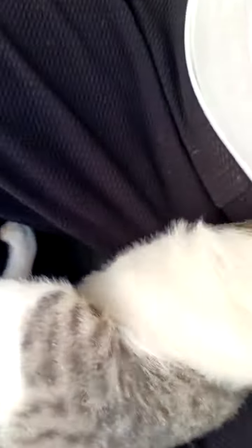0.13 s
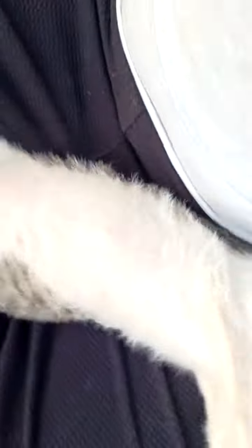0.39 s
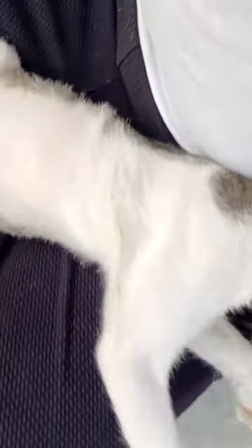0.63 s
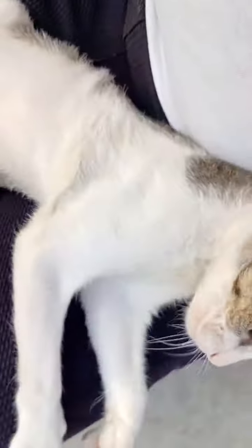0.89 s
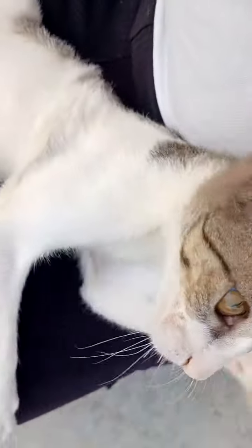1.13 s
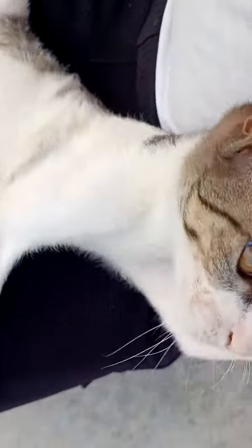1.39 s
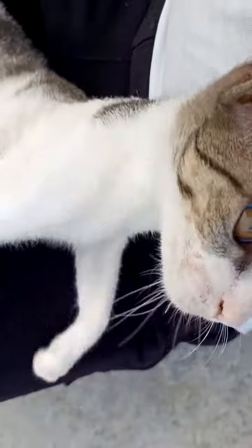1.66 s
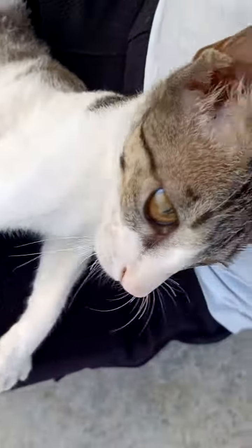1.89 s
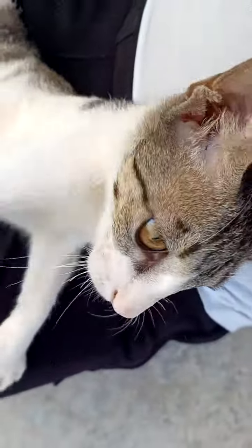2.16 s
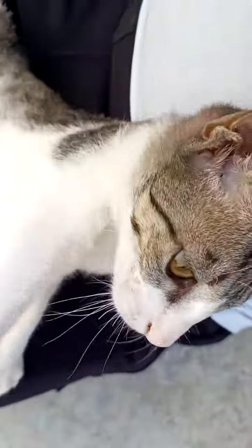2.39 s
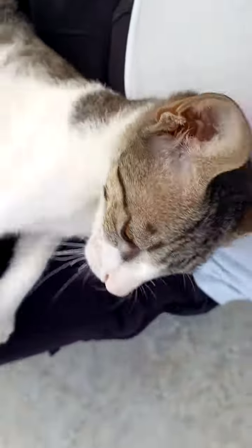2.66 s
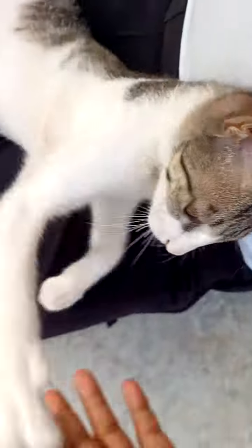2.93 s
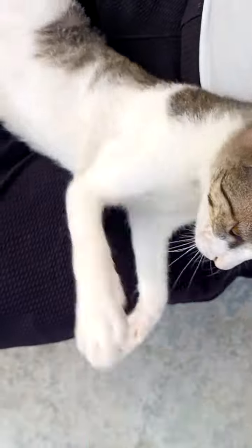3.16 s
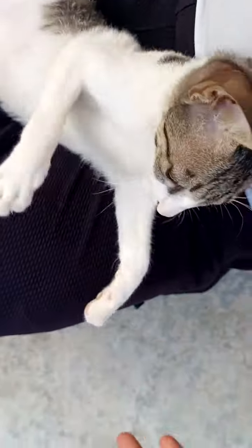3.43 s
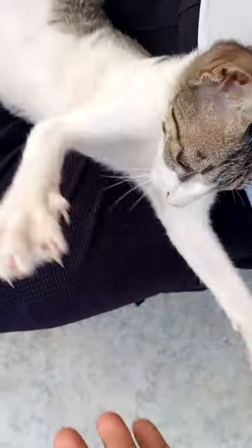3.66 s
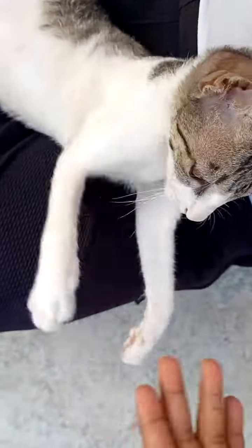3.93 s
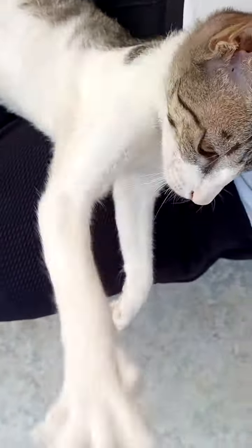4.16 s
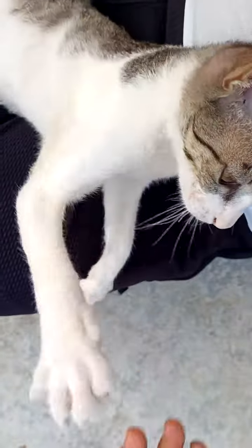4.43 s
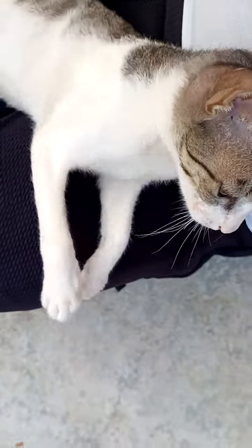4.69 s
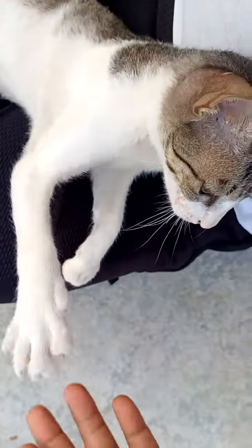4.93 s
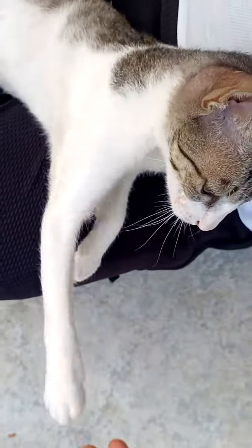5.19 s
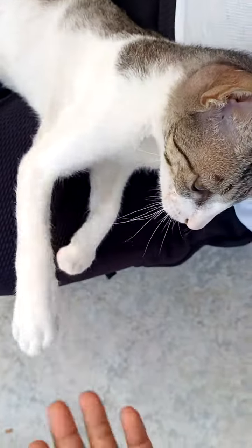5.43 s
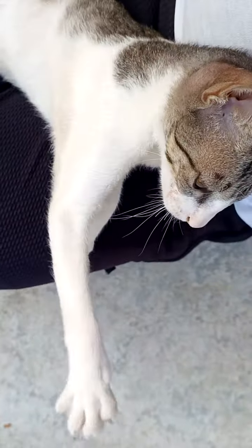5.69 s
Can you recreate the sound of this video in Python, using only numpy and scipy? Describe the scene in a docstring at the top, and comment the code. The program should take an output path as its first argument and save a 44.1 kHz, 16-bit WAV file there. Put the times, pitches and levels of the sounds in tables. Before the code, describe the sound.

Close, grainy cat purring with buffeting low wind, rising bird sweeps bouncing off walls, faint traffic and a few distant horn beeps.

```python
"""Kitten purring on a lap

A kitten purrs on someone's lap, close to a handheld recorder with two microphone ports.
The purr is a train of snaps from the vocal folds, coloured by throat resonances.
Shaped noise makes the wind on each port, the far traffic, a grainy hiss and the claw ticks.
Gliding sines make small birds in an echoing yard; rows of overtones make the far horns."""
import sys
import numpy as np
from scipy import signal
from scipy.fft import rfft, irfft, next_fast_len
from scipy.io import wavfile
from scipy.ndimage import uniform_filter1d

SR = 44100
rng = np.random.default_rng(int(sys.argv[2]) if len(sys.argv) > 2 else 0)


def store_wav(level_fs):
    """Save 16-bit WAV to argv[1]."""
    pcm = np.round(np.clip(np.atleast_2d(level_fs), -1, 1) * 32767)
    wavfile.write(sys.argv[1], SR, pcm.T.astype(np.int16))


def gain_from_db(level_db):
    """Convert decibel levels to linear amplitude factors (20 dB per decade)."""
    decades = np.asarray(level_db, float) / 20
    return 10 ** decades


N = 256654   # length in samples


def in_time(rows):
    """Columns of a table whose rows start with a time, one value per sample."""
    s, *columns = np.transpose(rows)
    return [np.interp(np.arange(N) / SR, s, column) for column in columns]


def at_hz(points, hz):
    """A spectrum read on a log-frequency axis."""
    point_hz, value = np.array(points).T
    return np.interp(np.log(hz), np.log(point_hz), value)


def level_in(x, low_hz, high_hz):
    """Scales x so that the given band has rms 1, averaged over the ports."""
    power, hz = np.abs(rfft(x)) ** 2, np.fft.rfftfreq(N, 1 / SR)
    in_band = (hz > low_hz) & (hz < high_hz)
    return x * N / np.sqrt(2 * np.mean(power[..., in_band].sum(-1)))


def drift(rate, channels=1):
    """Random wander: normal draws of spread 1, twice rate per second, joined by straight lines."""
    steps = int(N / SR * rate * 2) + 2
    places = np.linspace(0, steps - 1, N)
    draws = rng.standard_normal((channels, steps))
    return np.array([np.interp(places, np.arange(steps), row) for row in draws])


def coloured(spectrum, likeness=((1, 0),)):
    """Stereo noise with a given spectrum and likeness between the ports."""
    hz = np.fft.rfftfreq(N, 1 / SR) + 1
    mid, side = rfft(rng.standard_normal((2, N))) * gain_from_db(at_hz(spectrum, hz))
    alike = np.clip(at_hz(likeness, hz), -1, 1)
    return irfft(np.sqrt(1 + alike) * mid + np.sqrt(1 - alike) * side * [[1], [-1]], N)


def pan(db):
    """Left and right gains, db apart, that keep the summed power."""
    left, right = gain_from_db(db / 2), gain_from_db(-db / 2)
    return np.array([left, right]) * np.sqrt(2 / (left ** 2 + right ** 2))


SWELL_EDGE_DB = 14.5   # a swell is this far down half a length from its peak


def swell(peak_s, half_s):
    """Power of a smooth rise and fall, 1 at its peak."""
    from_peak = (np.arange(N) / SR - peak_s) / half_s
    return gain_from_db(-2 * SWELL_EDGE_DB * np.minimum(from_peak ** 2, 20))


# Far traffic. Each row: frequency in Hz, density in dB per Hz before levelling.
TRAFFIC_SPECTRUM = [(24, -54), (40, -6.5), (107, -7), (216, -15), (252, -17), (350, -18), (426, -22),
                    (632, -25), (877, -30), (957, -29), (3120, -44.5), (3890, -42), (7500, -49),
                    (9750, -101), (16500, -120)]
# Traffic at the two ports. Each row: frequency in Hz, left-right likeness (1 is the same, 0 unrelated).
TRAFFIC_LIKENESS = [(60, 1), (130, 1), (290, 1), (640, -0.059), (1400, -0.073), (3000, -0.087)]
# Brighter part of the traffic. Each row: frequency in Hz, density in dB per Hz before levelling.
BRIGHT_TRAFFIC_SPECTRUM = [(1200, -32), (1800, -6), (2500, 1.5), (3300, 1.5), (4500, -22), (7000, -23)]
# Grainy hiss. Each row: frequency in Hz, density in dB per Hz before levelling.
HISS_SPECTRUM = [(1180, -79), (2000, -5), (3310, -10), (4010, 1.5), (4900, -1.5), (8100, -10), (13600, -8),
                 (16000, -11.5)]
# Steady background. Each row: time in seconds, then traffic, its brighter part and hiss, band levels in dB.
AMBIENCE_LEVELS = [(0, -64, -88, -71), (.5, -64.5, -70, -73), (.9, -65.5, -80.5, -74),
                   (1.6, -65, -72.5, -72), (2.4, -66.5, -78, -75.5), (3.4, -68, -73, -74),
                   (4.0, -68.5, -76, -75), (4.6, -71.5, -85, -78), (5.2, -68.5, -72, -78),
                   (5.82, -67.5, -92, -79.5)]
# Brief swells of the background. Each row: peak in seconds, half length in seconds,
# then what they add to the traffic, its brighter part and the hiss, band levels in dB.
BACKGROUND_SWELLS = [(.01, .04, -70, -87, -59), (0.307, 0.11, -60.5, -71, -67.5),
                     (0.476, 0.095, -66.5, -67.5, -66.5), (1.03, 0.069, -67, -85, -74),
                     (1.815, 0.096, -65.5, -74, -91), (1.94, 0.035, -76, -87, -78.5),
                     (2.151, 0.1, -61.5, -70, -81), (2.68, 0.087, -66, -86, -75),
                     (3.057, 0.086, -71, -75, -72), (3.49, 0.069, -67, -70, -81),
                     (4.13, .04, -83, -77, -72), (4.264, .06, -68, -74, -77),
                     (4.97, 0.087, -69.5, -75, -89), (5.3, .06, -69, -75, -93)]


def background():
    """Far traffic and a grainy hiss, as noise; all of it swells briefly at times."""
    power = gain_from_db(in_time(AMBIENCE_LEVELS)) ** 2
    for peak_s, half_s, *db in BACKGROUND_SWELLS:
        power = power + gain_from_db(db)[:, None] ** 2 * swell(peak_s, half_s)
    dull_gain, bright_gain, hiss_gain = np.sqrt(power)
    dull = level_in(coloured(TRAFFIC_SPECTRUM, TRAFFIC_LIKENESS), 745, 2040)
    bright = level_in(coloured(BRIGHT_TRAFFIC_SPECTRUM), 2300, 3420)
    grainy = coloured(HISS_SPECTRUM) * gain_from_db(2.0 * drift(250, channels=2))
    hiss = level_in(grainy, 6860, 17400) * pan(np.array([1.4]))   # a little stronger on the left
    return dull * dull_gain + bright * bright_gain + hiss * hiss_gain


# Far horns. Each row: start in seconds, length in seconds, pitch in Hz, relative level in dB.
HORN_CALLS = [(3.07, .16, 517, -70), (3.5, .3, 517, -73), (4.97, .32, 435, -68)]
# Tone of the horns. Each row: frequency in Hz, overtone gain in dB.
HORN_OVERTONES = [(450, -12), (900, 3), (1050, 0), (1300, -18), (1550, -2), (1750, -18), (2200, -10),
                  (2600, -12), (3050, -4), (3500, -25)]


def horns():
    """Slightly unsteady buzzers, each a sum of its first eight harmonics."""
    out, waver = np.zeros(N), 1 + 0.008 * drift(60)[0]
    for s, length_s, hz, db in HORN_CALLS:
        i, t = int(s * SR), np.arange(int(length_s * SR)) / SR
        phase = 2 * np.pi * np.cumsum(hz * waver[i:i + len(t)]) / SR
        tone = sum(gain_from_db(at_hz(HORN_OVERTONES, k * hz)) * np.sin(k * phase + k * k) for k in range(1, 9))
        shape = np.clip(np.minimum(t, length_s - t) / 0.0056, 0, 1)   # 5.6 ms ramps
        out[i:i + len(t)] += gain_from_db(db) * tone * shape
    return out


def notes(table, wobble, rise, fall, bend):
    """Near-sines gliding in pitch, fast at first if bend is below 1; fast wobble makes them hoarse."""
    out, shake = np.zeros(N), 1 + wobble * drift(250)[0]
    for s, length_s, start_hz, end_hz, db in table:
        i, z = int(s * SR), np.linspace(0, 1, int(length_s * SR))
        hz = (start_hz + (end_hz - start_hz) * z ** bend) * shake[i:i + len(z)]
        shape = np.clip(np.minimum(z / rise, (1 - z) / fall), 0, 1)   # rise, fall: shares of the note
        out[i:i + len(z)] += gain_from_db(db) * shape * np.sin(2 * np.pi * np.cumsum(hz) / SR)
    return out


def whistle(curve, wobble):
    """One long sine that follows a curve of pitch and level."""
    hz, db = in_time(curve)
    sounding = (db != db[0]) & (db != db[-1])
    shaken_hz = hz * (1 + wobble * drift(250)[0])
    return sounding * gain_from_db(db) * np.sin(2 * np.pi * np.cumsum(shaken_hz) / SR)


# Rising sweeps across the yard. Each row: start in seconds, start, knee and top pitch in Hz,
# relative level in dB.
BIRD_SWEEPS = [(0.407, 4400, 5310, 5970, -50.5), (0.663, 4310, 5314, 5800, -52.5),
               (0.926, 3700, 4844, 5310, -54), (1.178, 3490, 4900, 5310, -53),
               (1.435, 3300, 4740, 5240, -55.5), (1.694, 3350, 4760, 5220, -56),
               (2.008, 3230, 5020, 5476, -56.5), (3.665, 4240, 5430, 6440, -50),
               (3.949, 4594, 5220, 6090, -51), (4.255, 4430, 5066, 5850, -53)]
SWEEP_S = .118   # length of a sweep


def sweeps(knee=.68, top=.84, rise=0.35, wobble=.012):
    """Each sine climbs to a knee, slides quickly to its top note and holds it a moment."""
    out, shake = np.zeros(N), 1 + wobble * drift(250)[0]
    for s, start_hz, knee_hz, top_hz, db in BIRD_SWEEPS:
        i, z = int(s * SR), np.linspace(0, 1, int(SWEEP_S * SR))
        hz = np.interp(z, [0, knee, top, 1], [start_hz, knee_hz, top_hz, top_hz]) * shake[i:i + len(z)]
        shape = np.clip(np.minimum(z / rise, (1 - z) / 0.24), 0, 1)
        out[i:i + len(z)] += gain_from_db(db) * shape * np.sin(2 * np.pi * np.cumsum(hz) / SR)
    return out


YARD_T60_S = 0.31   # the echoes are 60 dB down by then


def yard(x, direct_db, echo_db, build_s=.01, bend=1.1):
    """Direct sound, then dense echoes off walls that build up and fade; other ones at each port."""
    t = np.arange(int(.6 * SR)) / SR
    envelope = (1 - np.exp(-t / build_s)) * gain_from_db(-60 * (t / YARD_T60_S) ** bend)
    echoes = rng.standard_normal((2, len(t))) * envelope
    echoes = echoes / np.sqrt(np.sum(echoes ** 2, axis=1, keepdims=True))
    return gain_from_db(direct_db) * x + gain_from_db(echo_db) * signal.fftconvolve(x[None], echoes, axes=1)[:, :N]


# Hoarse chirrups further off. Each row: start in seconds, length in seconds, start and end pitch in Hz,
# relative level in dB.
FAR_CHIRRUPS = [(.035, 0.036, 6560, 6630, -54.5), (.055, 0.033, 5670, 5530, -59),
                (.07, 0.058, 4250, 4520, -64.5), (.172, .037, 6260, 6800, -56),
                (.18, 0.057, 5660, 5200, -61), (.207, 0.028, 4120, 4580, -59.5),
                (.39, 0.022, 5880, 6630, -57.5), (.6, .023, 4340, 4000, -68),
                (.626, .038, 6120, 6860, -58.5), (.886, 0.057, 5780, 6590, -58.5),
                (1.111, .027, 6770, 6930, -64), (1.137, .039, 5630, 6040, -58),
                (1.36, 0.074, 5170, 5900, -63), (1.364, 0.037, 6300, 6780, -64),
                (1.623, 0.039, 6600, 6964, -70), (1.643, 0.048, 5640, 6070, -63.5),
                (1.957, 0.03, 5580, 5806, -62.5), (2.325, .05, 1850, 2043, -64),
                (2.515, .065, 1750, 2020, -63), (2.637, .023, 3960, 6060, -65),
                (2.638, .028, 5600, 6700, -57), (2.691, .056, 5270, 5260, -67.5),
                (2.734, 0.037, 4000, 3530, -67), (3.298, .15, 4220, 3710, -72.5),
                (3.589, .067, 4700, 6010, -65.5), (3.787, .08, 3890, 3410, -71.5),
                (3.91, 0.062, 5750, 6940, -61), (3.98, 0.094, 2800, 3200, -76),
                (4.135, 0.027, 3500, 4860, -59.5), (4.188, 0.059, 5640, 6870, -62.5),
                (4.205, 0.034, 3300, 4400, -64.5), (4.21, 0.035, 1760, 2560, -72),
                (4.223, 0.097, 2430, 3520, -72), (4.329, 0.054, 3181, 2745, -71),
                (4.97, .06, 2490, 2510, -73.5), (5.17, .06, 2030, 2080, -74),
                (5.26, 0.046, 2410, 2080, -71)]
# A long buzzing trill, far off. Each row: time in seconds, pitch in Hz, relative level in dB.
FAR_TRILL = [(4.44, 4020, -87), (4.52, 3884, -76), (4.75, 3850, -77.5), (4.93, 3770, -77), (5.0, 3770, -95)]
# Thin twitter of a nearer bird. Each row: start in seconds, length in seconds, start and end pitch in Hz,
# relative level in dB.
NEAR_TWITTER = [(.691, .026, 3780, 3610, -59), (4.993, 0.042, 4430, 3470, -61.5),
                (5.112, 0.022, 4450, 3450, -63), (5.15, .026, 3300, 4300, -68),
                (5.267, 0.032, 5870, 3680, -68), (5.335, .022, 3440, 4250, -65),
                (5.365, .025, 4300, 3800, -69), (5.425, .015, 3400, 3750, -69),
                (5.445, .01, 4500, 3560, -73)]
# Its arched whistle. Each row: time in seconds, pitch in Hz, relative level in dB.
NEAR_ARCH = [(4.93, 4900, -88), (4.94, 5450, -59.5), (4.955, 5980, -65), (4.975, 6130, -50.5),
             (5.015, 6145, -54), (5.04, 5910, -60), (5.07, 5700, -55), (5.095, 5230, -56.5),
             (5.12, 4870, -66), (5.135, 4500, -70), (5.14, 4400, -110)]
# A faint sustained tone. Each row: time in seconds, pitch in Hz, relative level in dB.
FAINT_TONE = [(3.3, 545, -95), (3.5, 545, -68), (4.2, 545, -67), (4.4, 545, -95)]


def birds():
    """Far birds arrive mostly as echoes; the near bird, horns and faint tone have a clear direct path."""
    far = sweeps() + notes(FAR_CHIRRUPS, wobble=0.0458, rise=0.025, fall=0.099, bend=.65)
    far = far + whistle(FAR_TRILL, wobble=0.077)
    near = notes(NEAR_TWITTER, wobble=0.0029, rise=0.21, fall=0.082, bend=1.5)
    near = near + whistle(NEAR_ARCH, wobble=0.0081)
    near = near + horns() + whistle(FAINT_TONE, wobble=0.0093)
    return yard(far, direct_db=-1.0, echo_db=7.0) + yard(near, direct_db=-2.0, echo_db=-2.0)


# Claw on cloth. Each row: start in seconds, relative level in dB, ring in Hz, left minus right in dB.
CLAW_TICKS = [(0.315, -31, 5140, 3), (1.9353, -54, 12000, 2), (2.334, -56, 8900, -5),
              (2.653, -60.5, 11000, 1), (2.997, -60, 10000, -5)]


def ticks(t60_s=0.0062):
    """Short bright snaps of decaying noise, each with a ring filtered out of it."""
    t, out = np.arange(1200) / SR, np.zeros((2, N))
    for s, db, hz, pan_db in CLAW_TICKS:
        i = int(s * SR)
        snap = rng.standard_normal((2, len(t))) * gain_from_db(db - 60 * t / t60_s)
        resonance = signal.butter(1, [hz / 1.02, hz * 1.02], "band", fs=SR, output="sos")
        ring = signal.sosfilt(resonance, snap)
        out[:, i:i + len(t)] += pan(pan_db)[:, None] * (0.18 * snap + 5.0 * ring)
    return signal.sosfilt(signal.butter(1, 2500, "high", fs=SR, output="sos"), out)


# Wind thuds on a port. Each row: frequency in Hz, density in dB per Hz before levelling.
THUD_SPECTRUM = [(12, -40), (20, -28), (66, 4), (81, 2), (95, 3), (151, -19.5), (200, -29), (260, -28),
                 (440, -120)]
# Sharper rumble of the wind. Each row: frequency in Hz, density in dB per Hz before levelling.
RUMBLE_SPECTRUM = [(90, -20), (140, 5), (220, 2), (350, -8.5), (600, -26.5), (1200, -53.5)]
# Breeze on the ports. Each row: time in seconds, thud level in dB, left minus right in dB,
# rumble level in dB.
BREEZE_LEVELS = [(0, -37.5, -2, -50), (.35, -53.5, -4, -61), (.8, -54.5, -3, -63.5),
                 (1.05, -36.5, 3.5, -52), (1.35, -38, 10, -46), (1.6, -39, 11, -51.5),
                 (1.95, -60, -4, -62.5), (2.15, -46.5, 14, -56), (2.4, -49.5, 11, -63.5),
                 (2.6, -27.5, 25, -45), (2.8, -45, 9, -64), (2.95, -43.5, -1, -57.5), (3.25, -35, 3, -50),
                 (3.55, -32.5, -3, -50.5), (3.8, -45, -6, -63), (4.1, -60.5, -2, -62), (4.7, -52.5, 1, -61),
                 (5.3, -56, -7.5, -70), (5.82, -55, 6, -63)]
# Single eddies. Each row: peak in seconds, half length in seconds, thud level in dB,
# left minus right in dB, rumble against thud in dB.
WIND_EDDIES = [(0.025, 0.03, -28, -10.5, -6.5), (0.255, 0.029, -33, -14, -12.5),
               (0.295, 0.034, -30.5, -30, -19), (0.43, 0.021, -30, 20, -32), (0.583, 0.03, -38, -8, -24),
               (0.66, 0.029, -47, 15, -24), (0.966, 0.025, -31.5, 29, -12.5), (1.038, 0.018, -36, -13, -30),
               (1.097, .03, -33.5, 12, -14), (1.246, 0.057, -24, 30, -11.5), (1.268, 0.063, -19.5, 27, -25),
               (1.331, 0.025, -25, 23, -12), (1.471, 0.03, -24.5, 30, -40), (1.607, 0.019, -33, 18, -27),
               (1.769, 0.064, -35.5, 22, -35), (1.867, 0.033, -40.5, 16, -18), (1.994, 0.014, -41, 6, -14),
               (2.054, 0.026, -33.5, 13, -15), (2.142, 0.045, -33, 25, -25), (2.475, 0.038, -36, 15, -17),
               (2.678, .05, -24, 36, -25), (2.754, 0.018, -24, 28, -27), (2.846, 0.04, -30.5, -13, -22),
               (3.054, .07, -30, -18, -15.5), (3.188, 0.023, -32, 24, -24), (3.418, 0.048, -22, 2, -22.5),
               (3.526, 0.053, -21.5, -2, -21.5), (3.652, 0.043, -33, -22, -33),
               (3.953, 0.022, -44.5, -7, -26), (3.995, .025, -45.5, -5, -24), (4.12, 0.034, -47.5, 7, -20),
               (4.224, 0.032, -44.5, 13, -18), (4.273, 0.025, -42.5, 0, -16), (4.336, .02, -47, 1, -24),
               (4.691, 0.068, -42.5, 2, -21), (4.823, .03, -48, 3, -28), (4.918, 0.078, -51, 8, -23),
               (5.008, 0.024, -39.5, 10, -21), (5.158, 0.043, -48, -1, -24), (5.27, .06, -54, -14, -25),
               (5.705, 0.059, -46.5, -1, -25), (5.815, 0.038, -37, -8, -33)]


def wind(steadiness=.75, lumps_db=5.5):
    """Eddies thud on each port separately, over a shifting breeze; each carries some sharper rumble."""
    db, pan_db, rumble_db = in_time(BREEZE_LEVELS)
    thud_power, rumble_power = (gain_from_db([db, rumble_db])[:, None] * pan(pan_db)) ** 2
    for peak_s, half_s, db, pan_db, sharp_db in WIND_EDDIES:
        push = (gain_from_db(db) * pan(pan_db)[:, None]) ** 2 * swell(peak_s, half_s)
        thud_power = thud_power + push
        rumble_power = rumble_power + gain_from_db(2 * sharp_db) * push
    thud = level_in(coloured(THUD_SPECTRUM), 35, 140)
    envelope = np.abs(signal.hilbert(thud, next_fast_len(N)))[:, :N]
    swing = uniform_filter1d(envelope, size=1200)
    # Evens out the chance swings of the noise, so the levels follow the tables.
    thud = thud / swing ** np.clip(steadiness, 0, 1)
    lumpy = coloured(RUMBLE_SPECTRUM) * gain_from_db(lumps_db * drift(40, channels=2))
    rumble = level_in(lumpy, 157, 334)
    return np.sqrt(thud_power) * level_in(thud, 31, 170) + np.sqrt(rumble_power) * rumble


# Breaths, in and out by turns. Each row: start in seconds, larynx closures per second at the start.
BREATH_STARTS = [(0, 22.446), (.506, 24.509), (1.066, 23.542), (1.7, 24.109), (2.424, 23.56),
                 (3.252, 23.947), (4.105, 23.216), (4.787, 25.693), (5.745, 24.3)]
# Relative height of a snap at the start of each breath, in dB, one value per breath.
BREATH_LEVELS = [-47, -47.5, -45, -44, -45.5, -46, -45.5, -47, -47]
# Flaps of the vocal folds within a cycle. Each row: delay in seconds, level in dB, random spread in dB.
FOLD_FLAPS = [(0, 0, 2.8), (.004, -4.5, 5.0), (.014, -9, 4.0)]
# Throat resonances. Each row: frequency in Hz, width in Hz, relative level in dB.
THROAT_RESONANCES = [(170, 210, 7), (286, 177, 2), (556, 240, -15.5)]
FIRST_CLOSURE_S = .0165
RATE_SAG_PER_S = 3.948   # closures per second lost each second: twitching slows as a breath runs on
# A breath also weakens, and falters where the breath turns.
BREATH_FADE_DB_PER_S, TURN_DIP_DB, TURN_S = 4.5, 3.5, 0.033


def purr(jitter_s=0.00094, crest_db=14.0):
    """Each twitch snaps the folds shut; they flap twice more, and the throat colours the snaps."""
    start_s, rate = np.transpose(BREATH_STARTS)
    t = np.arange(N) / SR
    breath = np.clip(np.searchsorted(start_s, t, "right") - 1, 0, None)
    since = t - start_s[breath]
    count = np.cumsum(rate[breath] - RATE_SAG_PER_S * since) / SR - FIRST_CLOSURE_S * rate[0]
    closures = np.flatnonzero(np.diff(np.floor(count)))
    to_turn = np.abs(t[:, None] - start_s).min(axis=1)
    effort_db = np.array(BREATH_LEVELS)[breath] - BREATH_FADE_DB_PER_S * since
    effort_db = effort_db - TURN_DIP_DB * np.exp(-to_turn / TURN_S)
    snaps = np.full(N, 1e-18)
    for delay_s, db, spread_db in FOLD_FLAPS:
        draw = rng.standard_normal((len(closures), 2))
        late = ((delay_s + jitter_s * draw[:, 0]) * SR).astype(int)
        snaps[np.clip(closures + late, 0, N - 1)] += gain_from_db(db + spread_db * draw[:, 1])
    voiced = 0
    for hz, width_hz, db in THROAT_RESONANCES:
        r = np.exp(-np.pi * width_hz / SR)
        poles = [1, -2 * r * np.cos(2 * np.pi * hz / SR), r * r]
        voiced = voiced + gain_from_db(db) * signal.lfilter([1, 0, -1], poles, snaps)
    muffled = signal.sosfilt(signal.butter(6, 660, fs=SR, output="sos"), voiced)     # closed mouth, fur
    ports = np.array([muffled, np.roll(muffled, shift=4)])     # the left port is a little nearer
    port_db = np.array([[0], [1.5]])     # yet the right one is louder
    return level_in(ports, 190, 970) * gain_from_db(effort_db - crest_db + port_db)


def scene():
    """All sources at the two ports."""
    return background() + birds() + ticks() + wind() + purr()


def low_pass(x):
    """Removes everything above the highest recorded frequency."""
    return signal.sosfilt(signal.butter(12, 16110, fs=SR, output="sos"), x)


def record(dry):
    """The microphones cut the deepest bass, below about 50 Hz."""
    cut = signal.sosfilt(signal.butter(2, 50, "high", fs=SR, output="sos"), dry)
    return low_pass(cut)


dry = scene()
out = record(dry)
store_wav(out)
```